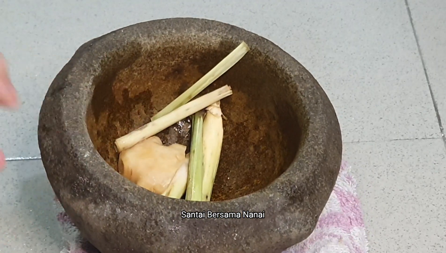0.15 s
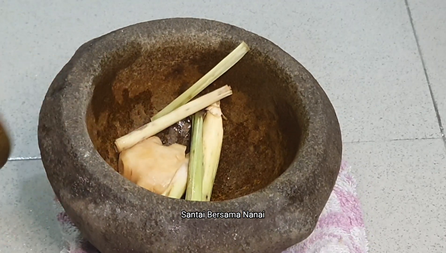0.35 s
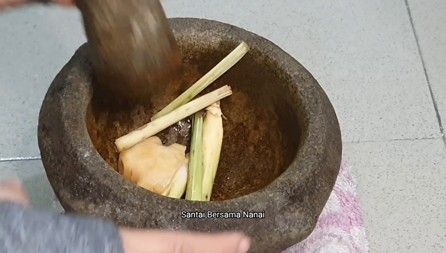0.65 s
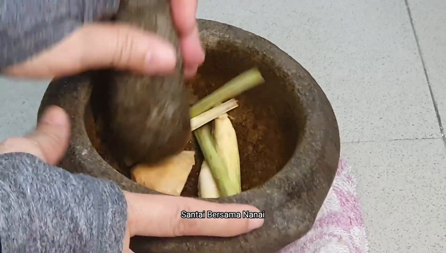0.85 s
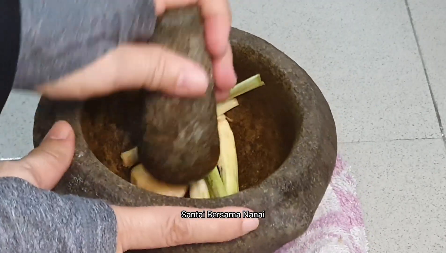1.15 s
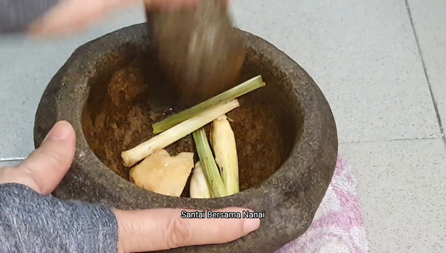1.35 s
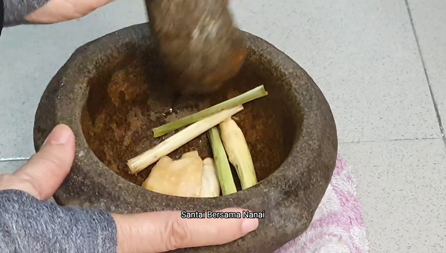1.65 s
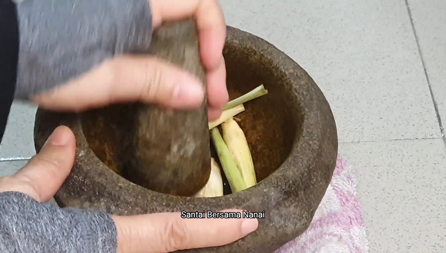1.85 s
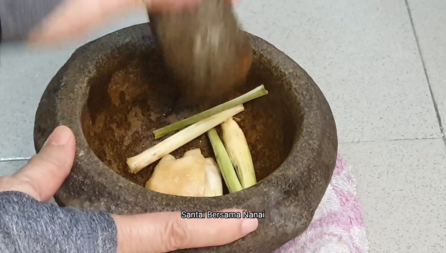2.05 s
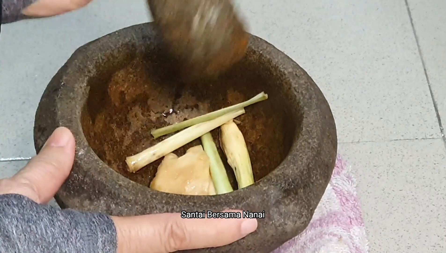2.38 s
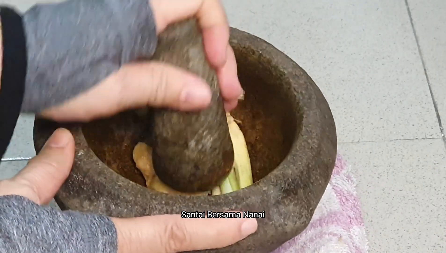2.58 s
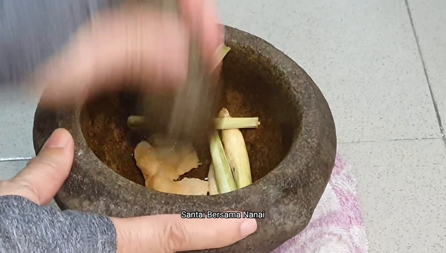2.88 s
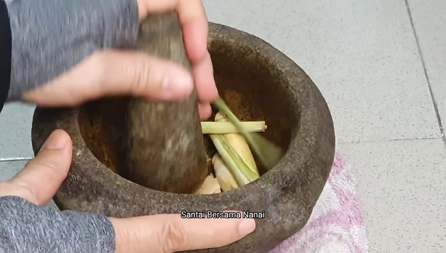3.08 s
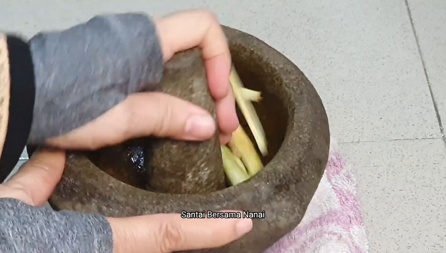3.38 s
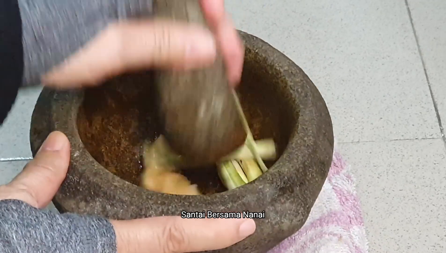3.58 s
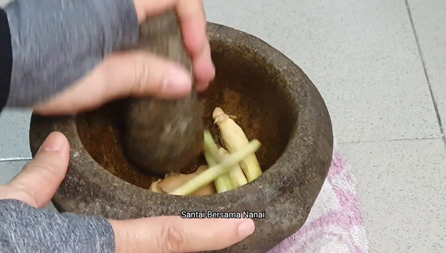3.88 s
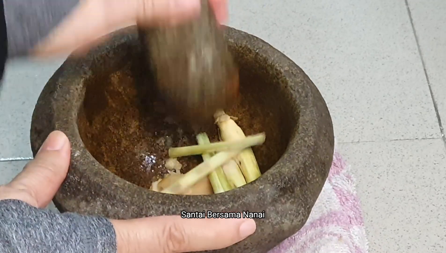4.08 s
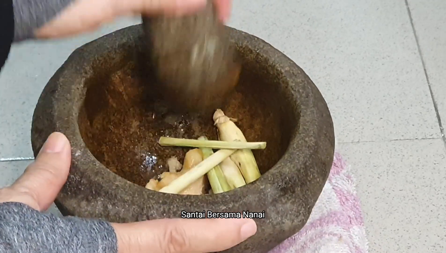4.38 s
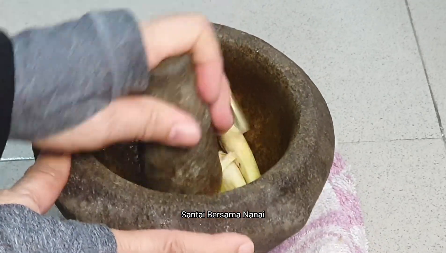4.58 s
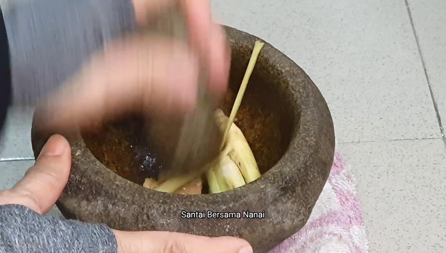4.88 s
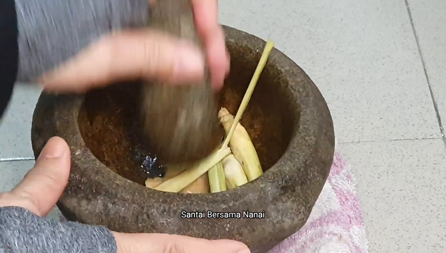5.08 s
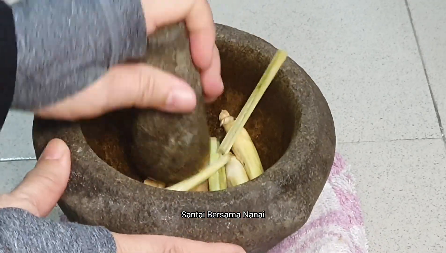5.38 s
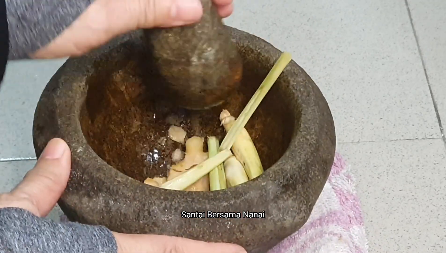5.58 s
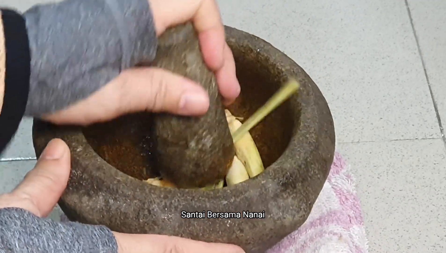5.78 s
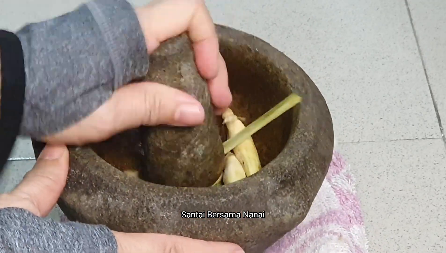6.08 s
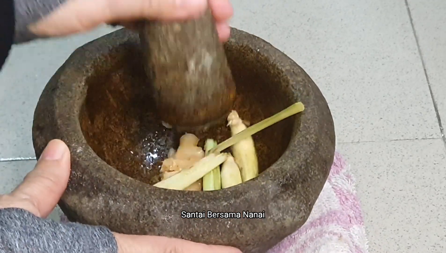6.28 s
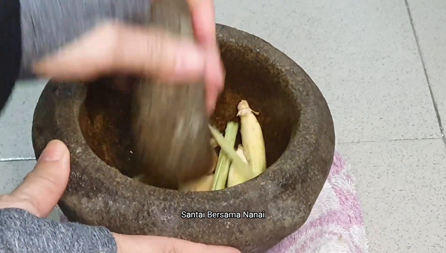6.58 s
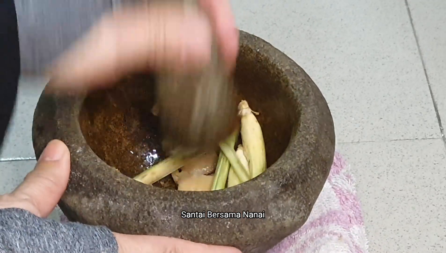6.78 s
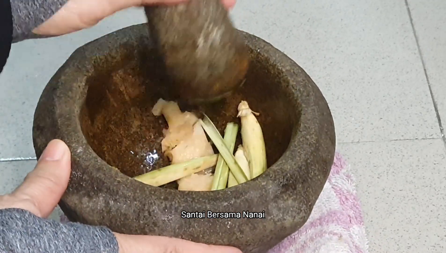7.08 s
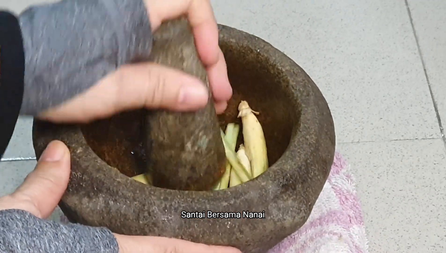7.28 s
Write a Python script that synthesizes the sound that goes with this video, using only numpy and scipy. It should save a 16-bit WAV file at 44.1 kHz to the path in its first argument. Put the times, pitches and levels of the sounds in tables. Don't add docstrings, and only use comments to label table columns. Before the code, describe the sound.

Uneven, juicy crushing thuds in a heavy stone bowl, broken by three sharp ringing stone-on-stone clacks, in a hard tiled kitchen with low hum.

```python
import sys
import numpy as np
from scipy import signal
from scipy.fft import rfft, irfft
from scipy.io import wavfile
from scipy.ndimage import uniform_filter1d, minimum_filter1d

SR = 44100
rng = np.random.default_rng(int(sys.argv[2]) if len(sys.argv) > 2 else 0)


def ratio(d):
    e = np.asarray(d, float) / 20
    return 10 ** e


def waveform_to_disk(signal):
    frames = np.transpose(np.atleast_2d(signal))
    scaled = np.clip(frames, -1, 1) * 32767
    samples = np.round(scaled).astype(np.int16)
    wavfile.write(sys.argv[1], SR, samples)


N = 328545


def evened(x):
    return x / np.sqrt(np.mean(x ** 2) + 1e-20)


def smoothed(x, size):
    return uniform_filter1d(uniform_filter1d(x, size), size)


def read(points, hz):
    f, value = np.transpose(points)
    return np.interp(np.log(hz + 1), np.log(f + 1), value)


def add(mix, s, sound):
    part = mix[round(s * SR):][:len(sound)]
    part += sound[:len(part)]


def colour(x, points, tilt_db=0):
    hz = np.fft.rfftfreq(len(x), 1 / SR)
    gain_db = read(points, hz) + tilt_db * np.log2(np.maximum(hz, 1000) / 5000)
    return irfft(rfft(x) * ratio(gain_db), len(x))


def ring(modes, t):
    return sum(ratio(db - 60 * t / t60) * np.sin(2 * np.pi * hz * t) for hz, db, t60 in modes) / 2


def pulse(t, hz, width_s):
    u = t / width_s - 2
    bell = np.exp(-np.where(u < 0, u, u / 1.36) ** 2)
    return bell * np.cos(2 * np.pi * hz * u * width_s + 0.32) * (t > 0)


# (frequency [Hz], level [dB per Hz])
AIR_COLOUR = [(15, -37.5), (25, -14.5), (86, -6), (109, -7.5), (149, -22), (187, -14), (291, -14),
              (488, -17), (682, -15.5), (756, -16.5), (1200, -18), (1480, -23), (2550, -31), (7740, -50.5),
              (12000, -69.5), (15600, -106), (22000, -120)]
# (frequency [Hz], likeness [-1 to 1])
SIDE_LIKENESS = [(60, 0.85), (120, 0.82), (220, 0.75), (430, 0.22), (840, -0.32), (1630, -0.34),
                 (3150, -0.01), (6090, -0.06), (11800, -0.09)]


def air():
    frames, hz = N // 256 + 5, np.fft.rfftfreq(1024, 1 / SR)
    a, b, c, d, patches = rng.standard_normal((frames, 513, 5)).T
    patches = evened(uniform_filter1d(uniform_filter1d(patches, 12, 0), 14, 1))
    same = np.clip(read(SIDE_LIKENESS, hz), -1, 1)[:, None]
    left = a + 1j * b
    right = same * left + np.sqrt(1 - same ** 2) * (c + 1j * d)
    shaped = np.array([left, right]) * ratio(read(AIR_COLOUR, hz)[:, None] + 0.67 * patches)
    return evened(signal.istft(shaped, nperseg=1024, noverlap=768)[1][:, :N])


def rumble(modes):
    hz = np.fft.rfftfreq(N, 1 / SR)
    shape = sum(ratio(db) / (1 + ((hz - f) / w * 2) ** 2) for f, w, db in modes)
    return evened(irfft(rfft(rng.standard_normal(N)) * shape, N))


# (frequency [Hz], width [Hz], level [dB])
ROOM_MODES = [(44, 24, 0.5), (74, 10, -0.5), (124, 7.5, -16), (172, 23, -15), (242, 8, -21.5),
              (397, 90, -16)]
# (time [s], level [dB])
STREET = [(0, -50), (1.2, -47), (1.42, -56), (1.56, -52), (1.64, -39), (2.0, -43), (2.9, -47), (3.5, -51),
          (5.0, -51), (5.9, -50), (7.45, -52)]
# (frequency [Hz], width [Hz], level [dB])
DRONE = [(100, 14, 0), (150, 60, -10), (300, 30, -9), (400, 90, -11)]
# (time [s], level [dB])
MOTOR = [(0, -51), (.8, -52), (1.4, -61), (1.82, -41), (2.1, -54), (2.6, -62), (2.9, -50), (3.7, -49),
         (4.0, -60), (4.25, -47), (4.6, -50), (5.7, -47), (6.2, -52), (7.1, -51), (7.4, -61)]
# (time [s], level [dB])
BUZZ = [(0, -62), (1.0, -63), (1.9, -53), (2.5, -61), (3.4, -55), (4.1, -56), (4.4, -62), (5.3, -54),
        (6.3, -54), (7.45, -60)]
AIR_DB, STREET_QUIET_DB, AIR_SHARE = -49, -66, .12
SURGE_S, SURGE_RISE_S, SURGE_HOLD_S, SURGE_FALL_S, SURGE_DB = 1.56, .15, .4, .1, -50
HUM_HZ, BUZZ_HZ, WAVER_DB = 50., 300.14, 1.8


def background():
    t = np.arange(N) / SR
    street_db, motor_db, buzz_db = (np.interp(t, *np.transpose(c)) for c in (STREET, MOTOR, BUZZ))
    room = ratio(AIR_DB + AIR_SHARE * (street_db - STREET_QUIET_DB)) * air()
    room = room + ratio(street_db - 5.5) * rumble(ROOM_MODES)
    since = t - SURGE_S
    surge = np.clip(since / SURGE_RISE_S, 0, 1)
    surge = surge * np.exp(-np.maximum(since - SURGE_HOLD_S, 0) / SURGE_FALL_S)
    waver = [WAVER_DB * evened(smoothed(v, 4000)) for v in rng.standard_normal((2, N))]
    motor = ratio(motor_db + waver[0] + 3) * np.sin(2 * np.pi * 2 * HUM_HZ * t)
    buzz = ratio(buzz_db + waver[1] + 3) * np.sin(2 * np.pi * BUZZ_HZ * t)
    return room + ratio(SURGE_DB) * surge * rumble(DRONE) + motor + buzz


# (frequency [Hz], fade time [s])
KITCHEN_FADE = [(300, 0.29), (900, 0.56), (2100, 0.51), (4500, 0.44), (8000, 0.37), (11000, 0.47)]
# (frequency [Hz], level [dB])
WALL_COLOUR = [(300, 6), (600, -0.1), (1030, 13.5), (1500, -4), (2200, -7), (4500, 0.5), (10000, -5)]
# (time [s], level [dB])
FIRST_ECHOES = [
    (.0035, -13.5),
    (0.0106, -16),
    (0.012, -11.5),
]


def kitchen(x):
    taps = np.zeros((2, SR))
    at = np.arange(120, SR - 20, 20) + rng.integers(0, 20, (2, (SR - 121) // 20))
    np.put_along_axis(taps, at, rng.choice([-1., 1.], at.shape), 1)
    hz, t, z = signal.stft(taps, SR, nperseg=256)
    same = read(SIDE_LIKENESS, hz)[:, None]
    z = np.array([z[0], same * z[0] + np.sqrt(1 - same ** 2) * z[1]])
    z = z * ratio(-60 * t / read(KITCHEN_FADE, hz)[:, None] + read(WALL_COLOUR, hz)[:, None])
    build_up = 1 - 0.52 * np.exp(-(np.arange(SR) / SR / 0.0037) ** 4)
    tail = signal.istft(z, SR, nperseg=256)[1][:, :SR] * build_up
    tail = tail / np.linalg.norm(tail[0])
    for s, db in FIRST_ECHOES:
        arrivals = np.round((s + rng.uniform(0, .0006, 2)) * SR).astype(int)
        tail[[0, 1], arrivals] += ratio(db)
    return signal.fftconvolve(x[None], tail, axes=1)[:, :N]


NEAR_DB, LAG_S = 6.5, .00007


def placed(x, near_db):
    late = np.roll(x, round(LAG_S * SR))
    return np.array([x * ratio(near_db / 2), late * ratio(-near_db / 2)])


def snaps(count):
    return rng.standard_normal(count) * ratio(16 * uniform_filter1d(rng.standard_normal(count), 30))


# (frequency [Hz], level [dB per Hz])
FIBRE_COLOUR = [(710, -36), (1200, -7), (1570, -11.5), (2020, 0), (2590, -8), (3110, -1.5), (4120, -9),
                (7700, -5), (10600, -17), (12000, -28.5), (15600, -47.5), (22000, -120)]


def squash(db, length_s, tilt_db):
    count = round(max(length_s, .004) * SR)
    press = snaps(count=1000)[:count] * signal.windows.tukey(count, .3)
    press = np.pad(press, (0, 600))
    return ratio(db) * evened(colour(press, FIBRE_COLOUR, tilt_db))


# (frequency [Hz], level [dB], fade time [s])
BOWL = [(480, -6, .01), (830, -6, .02), (1050, 0.1, .018), (1300, -4, .012)]
CLINK_DB, CLINK_PER_DB = 4, .55


def crush(db, knock_db, thud_db, tilt_db, snap_hz, lead_s=.012):
    t = np.arange(round(.16 * SR)) / SR - lead_s
    after = np.maximum(t, 0)
    settle = np.exp(-after / 0.0016) + 0.17 * np.exp(-after / 0.018)
    press = np.where(t < 0, 0.24 * np.exp(t / 0.0043), settle)
    fibres = colour(press * evened(snaps(count=len(t))), FIBRE_COLOUR, tilt_db)
    fibres = 1.95 * fibres / abs(fibres).max()
    click = 1. * (np.arange(len(t)) == round(lead_s * SR))
    blended = colour(click, FIBRE_COLOUR, tilt_db)
    blended = blended * np.linalg.norm(fibres) / np.linalg.norm(blended)
    knock_hz = 2100 * rng.uniform(.95, 1.05)
    stone = ratio(knock_db) * pulse(after, knock_hz, 0.000564)
    stone = stone + ratio(-5.5) * pulse(after, snap_hz, 0.000692)
    stone = stone + ratio(thud_db) * ring(BOWL, after)
    stone = stone + ratio(knock_db + CLINK_DB + CLINK_PER_DB * db) * pulse(after, 4400, .0012)
    for when, pitch, size in rng.random((6, 3)):
        strand_db = -9 - 9 * size + 2 * min(tilt_db, 0)
        since = np.maximum(t + .008 - .02 * when, 0)
        stone = stone + ratio(strand_db) * pulse(since, snap_hz * 2 ** (pitch - .3), .0004)
    return ratio(db) * (fibres + stone), ratio(db - 3) * (blended + stone)


# (frequency [Hz], level [dB per Hz])
SPLINTER_COLOUR = [(300, -40), (1300, 7), (2200, 3.5), (3300, 7), (4300, 3), (5200, -13), (6800, -15),
                   (8000, -42), (11500, -39), (14000, -87)]
# (frequency [Hz], level [dB], fade time [s])
PESTLE = [(2180, -9, .3), (3946, 0, .36), (4002, -2, .42), (4070, -8, .15), (4400, -10, .15)]
# (frequency [Hz], level [dB], fade time [s])
RIM = [(2130, -3, .2), (2190, 0, .3), (2290, -3, .22)]
KNOCK_HZ, KNOCK_HZ_PER_DB = 2130, 5
CONTACT_S, CONTACT_S_PER_DB = .00042, .000006
RIM_DB, SPREAD_PER_DB = -31, .16
SHIVER_DB, SHIVER_T60_S = -10, .015


def knock(db, thump_db, splinter_db, ring_db, lead_s=0.0067):
    hz, width_s = KNOCK_HZ + KNOCK_HZ_PER_DB * db, CONTACT_S + CONTACT_S_PER_DB * splinter_db
    t = np.arange(round(.7 * SR)) / SR - lead_s
    after = np.maximum(t, 0)
    grit = rng.standard_normal(len(t)) * np.exp(-after / .0014) * (t > .0005)
    splinter = colour(grit, SPLINTER_COLOUR)
    splinter = ratio(splinter_db) * splinter / abs(splinter).max()
    click = 1. * (np.arange(len(t)) == round(lead_s * SR) + 40)
    blended = colour(click, SPLINTER_COLOUR)
    blended = blended * np.linalg.norm(splinter) / np.linalg.norm(blended)
    start = 1 - np.exp(-(after / 0.0007) ** 2)
    grip = ratio(3.2 * evened(smoothed(rng.standard_normal(len(t)), 500)))
    body = pulse(after, hz, width_s) + ratio(-11) * ring(BOWL, after) * start
    late = np.maximum(after - 2 * width_s, 0)
    shiver = ratio(SHIVER_DB - 60 * late / SHIVER_T60_S) * np.cos(2 * np.pi * hz * late + .32)
    body = body + shiver * (1 - np.exp(-late / width_s))
    body = body + ratio(thump_db) * pulse(after, 817, 0.00058)
    rings = (ratio(ring_db) * ring(PESTLE, after) + ratio(RIM_DB) * ring(RIM, after)) * start * grip
    spread = ratio(SPREAD_PER_DB * (splinter_db + 5)) * (body + blended) + rings
    return body + splinter + rings, spread


# (time [s], crush level [dB], pestle knock [dB rel], bowl thud [dB rel],
# brightness [dB per octave])
ROOT_BLOWS = [
    (1.285, -40.5, 1, -9, -4),
    (1.6202, -28, -16, -4, 1.5),
    (1.9671, -28, -22, -4.5, .6),
    (2.7105, -21, 0, -5.5, -1.5),
    (3.1186, -29, 1, -5.5, 1.8),
    (5.1097, -33, -29, -30, 1.5),
    (5.88, -28, 0.5, -24, 4.5),
    (7.029, -38.5, 1, -14, 0.5),
    (7.3994, -28, -3, -17, 5),
]
# (time [s], crush level [dB], pestle knock [dB rel], bowl thud [dB rel],
# brightness [dB per octave])
STALK_BLOWS = [
    (0.9648, -42, -2, -16, 0),
    (2.3249, -24, 0, -11, 5.5),
    (4.7281, -37, -5, -16, 1),
    (5.495, -26, 4, -2.5, 1.5),
    (6.2746, -35, -23, -23, -0.3),
]
# (time [s], level [dB], length [s], brightness [dB per octave])
SQUASHES = [(3.546, -38, 0.016, -5), (3.562, -22, 0.006, -2), (4.012, -54.5, 0.016, 2),
            (4.344, -49, 0.005, -1), (4.352, -51, 0.014, -4.2), (4.72, -52, 0.016, .1),
            (5.872, -43.5, .009, 0.5), (6.263, -54, .011, 2), (6.601, -57.5, 0.0087, .1),
            (6.617, -48.5, .018, .1), (6.652, -32, 0.0049, -7)]
# (time [s], strength [dB], thump [dB rel], splinter [dB rel], pestle ring [dB rel])
KNOCKS = [
    (3.5614, 8.5, -16.5, -.5, -25),
    (4.0449, 1.5, -15, -26, -39.5),
    (6.6516, 1, -30, -2.5, -22.5),
]
# (time [s], peak level [dB], frequency [Hz])
BOUNCES = [
    (3.5865, -11, 974),
    (3.597, -11, 2050),
    (6.682, -14, 2070),
]
ROOT_SNAP_HZ, STALK_SNAP_HZ = 3080, 5800
ROOM_DB = -4


def pounding():
    soft, hard, sends = np.zeros(N), np.zeros(N), np.zeros((3, N))
    blows = [(*b, ROOT_SNAP_HZ) for b in ROOT_BLOWS] + [(*b, STALK_SNAP_HZ) for b in STALK_BLOWS]
    for k, (s, *blow) in enumerate(sorted(blows)):
        direct, spread = crush(*blow)
        add(soft, s - .012, direct)
        add(sends[k % 3], s - .012, spread)
    for k, (s, *press) in enumerate(SQUASHES):
        sound = squash(*press)
        add(soft, s, sound)
        add(sends[k % 3], s, ratio(-2.5) * sound)
    for k, (s, db, *contact) in enumerate(KNOCKS):
        direct, spread = knock(db, *contact)
        add(hard, s - .006, ratio(db) * direct)
        add(sends[k % 3], s - .006, ratio(db + ROOM_DB) * spread)
    for s, db, hz in BOUNCES:
        sound = ratio(db) * pulse(np.arange(300) / SR, hz, 1.042 / hz)
        add(hard, s, sound)
        add(sends[0], s, ratio(-7.5) * sound)
    return placed(soft, NEAR_DB) + placed(hard, 1.0) + sum(kitchen(send) for send in sends)


def scene():
    return background() + pounding()


def low_pass(x):
    return signal.sosfilt(signal.butter(12, 12380, fs=SR, output="sos"), x)


EDGE_HZ = 11500
DUCK_FROM_DB, DUCK_SHARE, DUCK_SENSE_S, RECOVER_DB_PER_S = -34, .18, .15, 30
CEILING_DB, RELEASE_S = -.5, .014


def record(dry):
    band = signal.butter(3, 36, "high", fs=SR, output="sos")
    edge = signal.firwin(255, EDGE_HZ, window=("kaiser", 9), fs=SR)
    heard = signal.sosfilt(band, dry)
    keep = np.exp(-1 / SR / DUCK_SENSE_S)
    power = signal.lfilter([1 - keep], [1, -keep], (heard ** 2).mean(0))
    power_db = 10 * np.log10(power + 1e-12)
    back = np.arange(N) / SR * RECOVER_DB_PER_S
    held_db = np.maximum.accumulate(power_db + back) - back
    duck_db = DUCK_SHARE * np.maximum(held_db - DUCK_FROM_DB, 0)
    heard = heard / ratio(signal.lfilter([1 - keep], [1, -keep], duck_db))
    peak_db = -minimum_filter1d(-20 * np.log10(abs(heard).max(0) + 1e-9), size=90)
    fall = np.arange(N) / SR / RELEASE_S
    log_over = np.log(np.maximum(peak_db - CEILING_DB, 1e-9))
    over_db = np.exp(np.maximum.accumulate(log_over + fall) - fall)
    held = heard / ratio(uniform_filter1d(over_db, size=80))
    return low_pass(signal.oaconvolve(held, edge[None], "same"))


dry = scene()
out = record(dry)
waveform_to_disk(out)
```